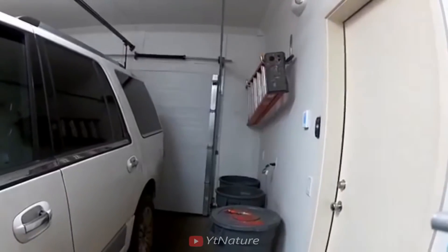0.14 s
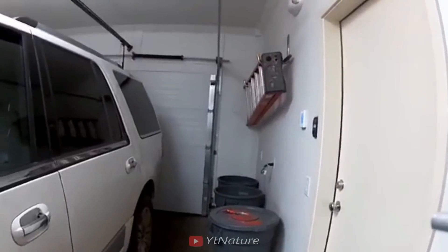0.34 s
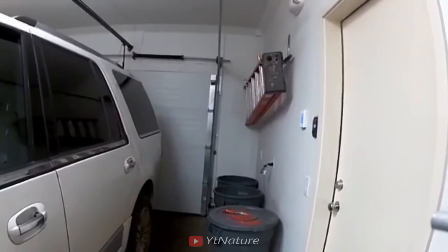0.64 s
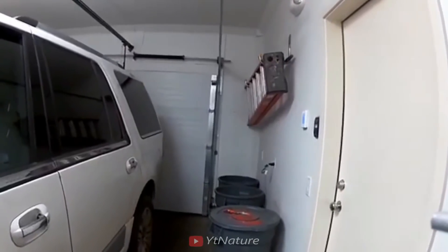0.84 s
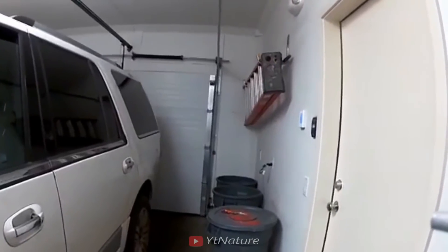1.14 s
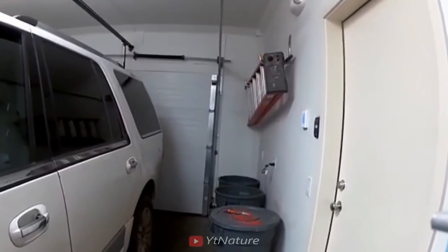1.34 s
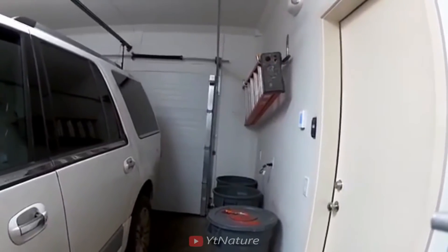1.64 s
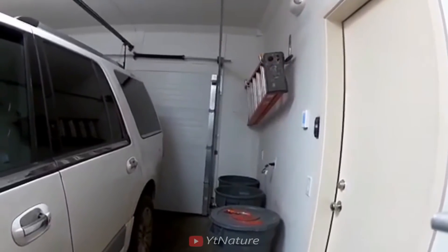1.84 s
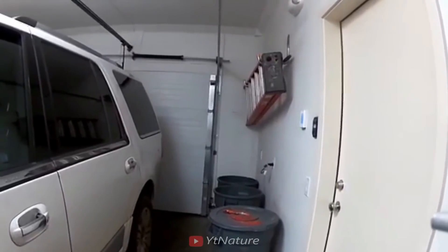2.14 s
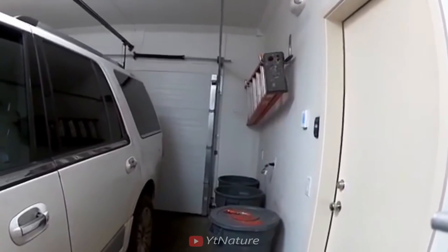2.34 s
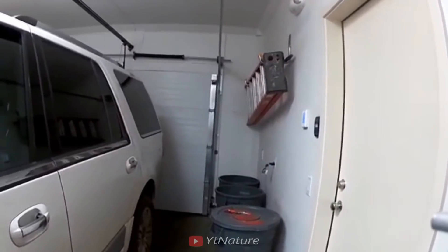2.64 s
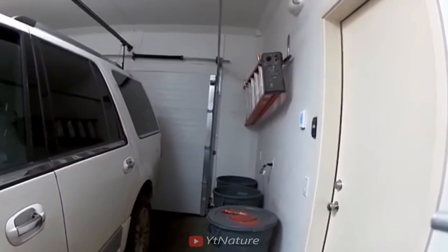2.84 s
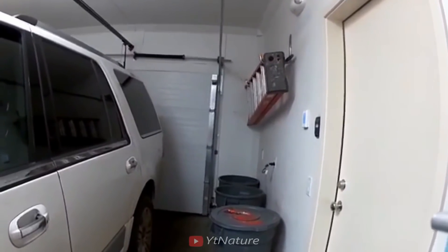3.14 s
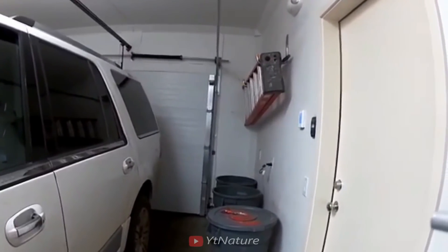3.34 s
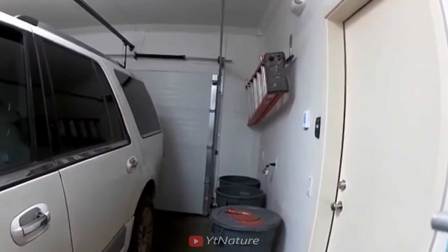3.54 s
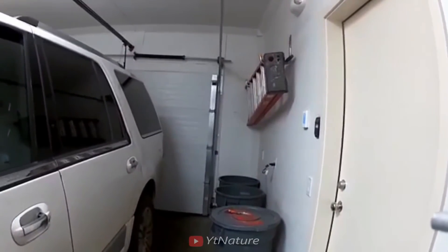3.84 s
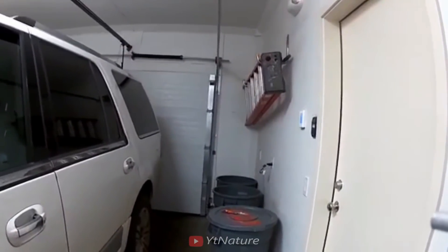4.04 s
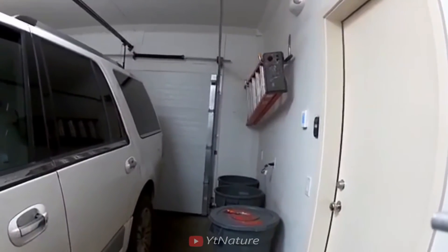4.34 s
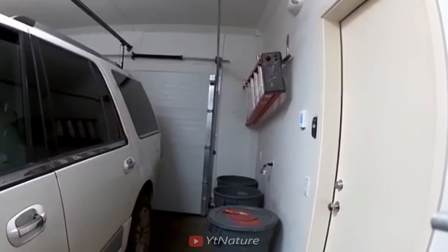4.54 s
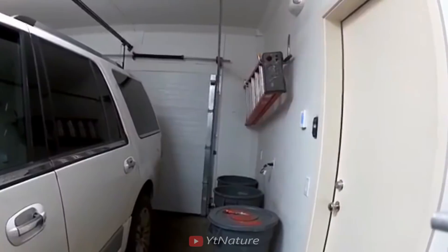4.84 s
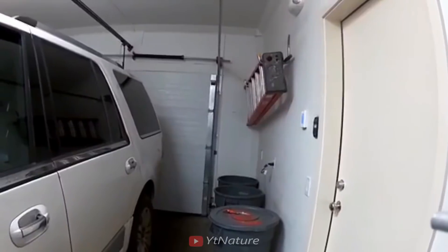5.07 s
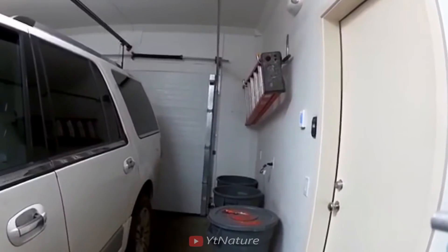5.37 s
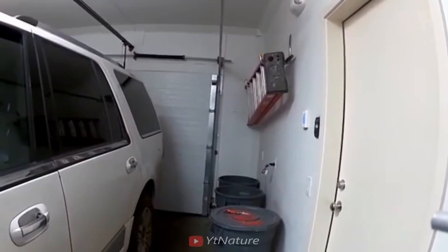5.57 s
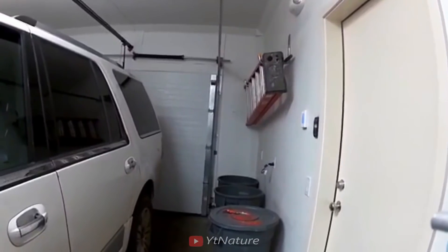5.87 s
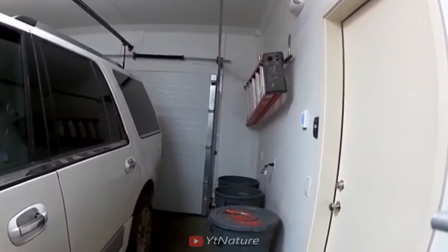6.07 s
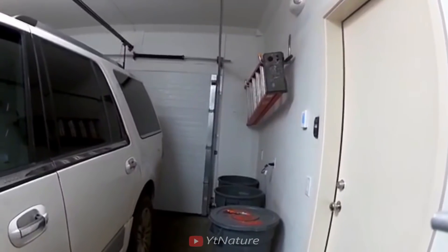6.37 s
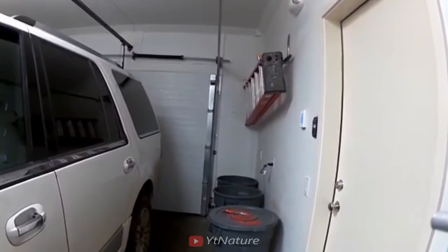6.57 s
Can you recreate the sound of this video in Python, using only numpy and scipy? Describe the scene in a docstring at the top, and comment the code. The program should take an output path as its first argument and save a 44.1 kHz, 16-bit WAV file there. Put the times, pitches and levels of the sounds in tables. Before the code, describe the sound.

An earthquake shakes a closed garage: panels thud, a loose door knocks, steel tracks and ladder clang and rattle over low ground rumble.

```python
"""Loose metal chatters at once, then thuds and clangs crash in: an earthquake shakes a closed garage.
Panels and walls thud, a loose door knocks in its frame, steel tracks and a hung ladder clang,
a small fitting jingles and hard little parts tick close by, all over a low ground rumble.
Struck things are sums of dying sine waves set off by random contacts; rumble and clatter are coloured noise.
One microphone hears it all, overdriven by the hardest blows, with its own faint hiss."""
import sys
import numpy as np
from scipy import signal
from scipy.fft import rfft, irfft, next_fast_len
from scipy.io import wavfile
from scipy.ndimage import uniform_filter1d, map_coordinates

SR = 44100
rng = np.random.default_rng(int(sys.argv[2]) if len(sys.argv) > 2 else 0)


def waveform_to_disk(signal):
    """Save audio, clipped to [-1, 1], as 16-bit WAV at the path in sys.argv[1]."""
    frames = np.transpose(np.atleast_2d(signal))
    scaled = np.clip(frames, -1, 1) * 32767
    samples = np.round(scaled).astype(np.int16)
    wavfile.write(sys.argv[1], SR, samples)


N = 295911  # length in samples


def amp(db):
    """Decibels to a plain multiplier."""
    return 10 ** (np.asarray(db) / 20)


def unit(x):
    """Scale a signal to an average (rms) strength of 1."""
    return x / np.sqrt(np.mean(x ** 2) + 1e-20)


def along(points, hz):
    """Read a curve of (pitch_hz, value) points, with pitch on a log axis."""
    f, v = np.transpose(points)
    return np.interp(np.log(hz + 1), np.log(f + 1), v)


def curve(points):
    """Join (start_s, value) points with straight lines, one value per sample."""
    s, value = np.transpose(points)
    return np.interp(np.arange(N) / SR, s, value)


def wobble(rate):
    """A smooth random curve with this many random points a second."""
    points = rng.standard_normal(int(N * rate / SR) + 4)
    return map_coordinates(points, [np.arange(N) * rate / SR])


def filtered(x, response):
    """Change the strength and timing of each frequency by a complex response."""
    m = next_fast_len(N + SR // 2)
    hz = np.fft.rfftfreq(m, 1 / SR)
    return irfft(rfft(x, m) * response(hz), m)[..., :N]


def noise(spectrum):
    """Steady noise of rms 1, coloured by a table of pitch_hz and level_db."""
    return unit(filtered(rng.standard_normal(N), lambda hz: amp(along(spectrum, hz))))


def rings(modes, size, attack):
    """One dying sine wave per mode, as rows; a soft contact (long attack, s) starts them gently."""
    hz, db, t60 = np.transpose(modes)[..., None]
    t = np.arange(size) / SR
    onset = 1 - np.exp(-(t / attack) ** 2)
    return amp(db - 60 * t / t60) * np.sin(2 * np.pi * hz * t) * onset


SHIFT = 0.016  # typical share by which modes move per blow, as the parts press differently on each other
FIRST_DB, FIRST_FADES_DB_PER_S = 5.5, 252.5  # first contact beside the hardest; softer in long scuffles
CRACK_S = 0.003  # time for the dry crack at each contact to fall 60 dB


def blows(table, modes, deep, ring_s, grows, lead, attack, focus_db, octaves, scatter_db, spiky_db, crack_db):
    """Each blow is a scuffle of contacts; its place favours modes near one pitch, long ones ring longer.

    Also returns each blow's loudness through time, offset by the last column in dB.
    That column also shifts the level of the modes marked deep, relative to the others."""
    size = SR // 4
    out, t = np.zeros((2, N + 2 * size)), np.arange(size) / SR
    pitch = np.log2(np.transpose(modes)[0])
    for s, db, hz, length, extra_db in table:
        chance = rng.standard_normal((3, size // 2))
        moved = np.array(modes) * (1 + SHIFT * chance[0, -len(modes):, None] * [1, 0, 0])
        ring = rings(moved, size, attack)
        near = np.exp(-((pitch - np.log2(hz)) / octaves) ** 2)
        mode_db = focus_db * near + extra_db * deep + scatter_db * chance[0, :len(modes)]
        decay = amp(-60 * t / max(ring_s + grows * length, .01))
        body = amp(mode_db) @ ring * decay
        crack = amp(crack_db - 60 * t / CRACK_S) * rng.standard_normal(size)
        body += crack * np.abs(body).max()
        # uneven contacts that thin out over the scuffle
        u = t[:size // 2] / max(length, .001)
        fade = u ** 0.093 * np.exp(-1.3 * u ** 1.41)
        contacts = chance[1] * amp(spiky_db * np.minimum(chance[2], 2.2)) * fade
        first = amp(FIRST_DB - FIRST_FADES_DB_PER_S * length) * np.abs(contacts).max()
        contacts[round(lead * SR)] = first
        sound = signal.fftconvolve([body, decay ** 2.28], [contacts, contacts ** 2], axes=1)
        loudest = np.sqrt(uniform_filter1d(sound ** 2, size=SR // 80).max(axis=1))
        level = amp([db - 8.5, db + extra_db]) / loudest  # peaks stand some dB over the rms
        out[:, round((s - lead) * SR):][:, :sound.shape[1]] += level[:, None] * sound
    return out[:, :N]


BIGGEST = 2.8  # cap on the size of a chatter knock, in spreads above the usual
TREMBLE_DB = -5  # even tremble beside the separate knocks


def chatter(level, modes, attack, t60, spiky_db, clumpy_db):
    """Dense small knocks of uneven size, in clumps, ring the modes over an even tremble."""
    size_db = spiky_db * np.minimum(rng.standard_normal(N), BIGGEST)
    knocks = rng.standard_normal(N) * amp(size_db + clumpy_db * wobble(35))
    knocks = unit(knocks) + amp(TREMBLE_DB) * rng.standard_normal(N)
    decay = amp(-60 * np.arange(SR // 4) / SR / t60)
    ring = rings(modes, SR // 4, attack).sum(0) * decay
    return signal.fftconvolve(level * unit(knocks), ring / np.linalg.norm(ring))[:N]


# strength of the ground rumble through time: start_s, level_db
RUMBLE_LEVEL = [(0.0, -34.5), (1.12, -41.5), (2.71, -41), (3.01, -42), (3.46, -43), (3.72, -37), (4.3, -44),
                (4.71, -40.5), (6.5, -45.5), (6.71, -43)]
# colour of the ground rumble: pitch_hz, level_db (per Hz)
GROUND_COLOUR = [(12, -12.5), (20, 13.5), (42, 19.5), (75, 13.5), (100, -26.5), (130, -8.5), (220, -120)]


def ground_rumble():
    """Low noise of the moving ground, swelling and sinking slowly."""
    return amp(curve(RUMBLE_LEVEL) + 0.39 * wobble(3.5)) * noise(GROUND_COLOUR)


# how long the room rings at each pitch: pitch_hz, time to fall 60 dB (s)
ROOM_DECAY = [(120, 0.28), (500, 0.22), (1500, 0.17), (6000, 0.35)]


def garage(x):
    """The room's answer, each frequency dying at its own speed; it changes as the sources move about."""
    step, wet = SR // 4, np.zeros(N + SR)
    for k in range(0, N, step):
        hz, t, z = signal.stft(rng.standard_normal(SR // 2), SR, nperseg=256)
        fade = amp(-60 * t / along(ROOM_DECAY, hz)[:, None])
        tail = signal.istft(z * fade, SR, nperseg=256)[1]
        answer = signal.fftconvolve(x[k:k + step], tail / np.linalg.norm(tail))
        wet[k + SR // 100:][:len(answer)] += answer  # 10 ms late
    return wet[:N]


# colour of the clatter of far things: pitch_hz, level_db (per Hz)
CLATTER_COLOUR = [(250, -120), (450, -1.5), (700, 1), (900, -1.5), (1400, -3.5), (2200, -2.5),
                  (2800, -26.5), (4000, -120)]


def far_clatter(shaking_db):
    """Far things blur into noise that follows the shaking."""
    return amp(shaking_db - 15 + 2.1 * wobble(12)) * noise(CLATTER_COLOUR)


# blows on a small metal fitting: start_s, level_db, favoured pitch_hz, contact length_s
FITTING_PINGS = [(0.539, -36, 6190, .01), (1.135, -40, 6190, .01), (1.568, -44, 4400, 0.015),
                 (2.48, -38, 6600, 0.036), (2.756, -33.5, 3170, 0.014), (2.82, -25, 3210, 0.0077),
                 (2.867, -29.5, 3260, 0.034), (3.67, -45, 6050, .01), (3.765, -32.5, 6030, .012),
                 (3.79, -34.5, 3210, 0.025), (5.268, -28, 3210, 0.02), (5.274, -41, 4540, 0.013),
                 (5.63, -34.5, 6400, .012), (6.094, -40, 3210, 0.019), (6.124, -28.5, 3080, 0.022),
                 (6.519, -30, 4600, 0.0087)]
# modes of the fitting: pitch_hz, level_db, time to fall 60 dB (s)
FITTING_MODES = [(2740, -4.5, 0.089), (3330, 0, 0.088), (3244, 0, 0.29), (3750, -9.5, 0.048),
                 (3900, -7.5, 0.088), (4300, -8.5, 0.074), (4500, -9, 0.066), (4440, -8, 0.091),
                 (5840, -15.5, 0.065), (6000, -13.5, .1), (6130, -11, 0.083), (6700, -17, .08),
                 (7010, -12.5, .08)]


def fitting(steel_db):
    """A small metal fitting jingles: high, narrow modes rung by blows and by steady chatter."""
    pings, _ = blows([(*row, 0) for row in FITTING_PINGS], FITTING_MODES, False, ring_s=0.097, grows=1.5,
                     lead=0.0015, attack=0.0014, focus_db=11.0, octaves=0.052, scatter_db=2.5,
                     spiky_db=8.5, crack_db=-22.5)
    return pings + chatter(amp(steel_db - 19), FITTING_MODES, attack=0.00065, t60=0.19,
                           spiky_db=8.5, clumpy_db=10.5)


DULL_HZ = 2250  # modes below this count as dull
TICK_S, TICK_DOUBLES_DB = 0.016, 15.5  # contact's 60 dB fall at level 0 dB; rise in level that doubles it
# ticks of small hard parts: start_s, bright modes level_db, dull modes beside them level_db
PART_TICKS = [(0.2391, -5, 13.5), (0.4244, -26, 7), (0.5467, -30, 2), (0.5686, -26, 6),
              (0.5852, -8.5, 17.5), (0.8361, -16, -1.5), (0.9143, -34, -1), (1.0207, -34, 11.5),
              (1.1, -27.5, 5.5), (1.3286, -25.5, -4), (1.4116, -10.5, 0.5), (1.936, -37, 0),
              (2.176, -49, -5.5), (2.2488, -29, 4), (2.284, -45, 13), (2.338, -36, 4), (2.601, -28.5, 10.5),
              (2.6465, -24.5, 6), (2.7343, -35.5, 12), (3.097, -32, -5), (3.4637, -47, 12),
              (3.515, -29.5, 6), (3.592, -30.5, 7), (3.647, -47, 0), (3.6538, -24.5, 1),
              (3.8595, -19.5, -5.5), (3.867, -33, -6), (3.874, -23, -1), (3.895, -29, 0),
              (3.9798, -27.5, 10), (4.0545, -45, -3), (4.3675, -15.5, 1.5), (4.4158, -32.5, 10),
              (4.4766, -32.5, 8), (4.7482, -19.5, 3), (4.7991, -27.5, 2), (5.1524, -24, -9),
              (5.309, -38, -3), (5.524, -30.5, 10), (5.654, -41, 3), (5.9416, -29.5, 10.5),
              (6.353, -22.5, 0.5), (6.4527, -33.5, -1), (6.5143, -42, -6)]
# modes of a small part: pitch_hz, level_db, time to fall 60 dB (s)
PART_MODES = [(701, -6, 0.042), (1328, 7, 0.013), (1980, 16.5, 0.0097), (2570, -3, 0.0087),
              (3282, -0.5, 0.0078), (3690, -5.5, 0.0056), (4200, -8, 0.003), (5570, -6.5, 0.0055),
              (6270, -3.5, 0.0034), (6100, -23, 0.013)]


def ticks():
    """A short rough contact rings a small hard part close to the microphone for some milliseconds."""
    size = SR // 30
    out, t = np.zeros(N + 2 * size), np.arange(size) / SR
    ring = rings(PART_MODES, size, attack=0.00047)
    dull = np.transpose(PART_MODES)[0] < DULL_HZ
    for s, db, dull_db in PART_TICKS:
        chance = rng.standard_normal((2, size))
        gains = amp(2.2 * chance[0, :len(PART_MODES)]) * [dull, ~dull]
        contact_s = TICK_S * 2 ** (db / TICK_DOUBLES_DB)
        contact = chance[1] * amp(-60 * t / contact_s)
        sound = signal.fftconvolve(gains @ ring, [contact], axes=1)
        level = amp([db + dull_db, db - 0.5]) / np.abs(sound).max(axis=1)
        out[round(s * SR):][:sound.shape[1]] += level @ sound
    return out[:N]


def small_parts(steel_db):
    """Single ticks over the steady chatter of the parts' higher modes."""
    return ticks() + chatter(amp(steel_db - 23.5), PART_MODES[3:], attack=0.00019, t60=0.0093,
                             spiky_db=16.5, clumpy_db=10)


DOOR_LOW_HZ = 45  # the door is weak below this
# a loose door knocks in its frame: start_s, level_db, ring of the leaf level_db (beside the knock)
DOOR_KNOCKS = [(0.1724, -4, -17), (0.567, -2, -10), (0.851, -12.5, -13), (1.0788, -3.5, -15),
               (1.447, -5, -2), (1.9184, -5, -5), (2.341, -6.5, -14), (2.823, -11, -7.5), (3.209, -4, -15),
               (3.638, 2, -8.5), (3.7359, -5, -14), (4.001, -6.5, -22), (4.8358, -3, -10.5),
               (5.291, -5, -0.5), (5.637, -1.5, -10), (6.4967, -13.5, -10.5)]
# it bounces against the frame three times: start_s (after the first), level_db
FRAME_JOLTS = [(0, -12.5), (0.0078, -5.5), (0.0155, -2.5)]
# the air pushed by each jolt: pitch_hz, level_db, time to fall 60 dB (s)
AIR_PUSH = [(215, 8, 0.009), (128.7, -14, 0.092), (156.8, -15, 0.2)]
# modes of the leaf, rung by the first jolt: pitch_hz, level_db, time to fall 60 dB (s)
LEAF_MODES = [(524.4, -1, 0.11), (383, -16.5, 0.12), (740, -5, 0.062), (655, -13, 0.084), (843, -14, 0.044),
              (1019, -3, 0.033)]


def door():
    """Three quick jolts, each pulling the air the same way; the leaf rings from the first."""
    size = SR // 4
    out = np.zeros(N + 2 * size)
    push = -rings(AIR_PUSH, size, attack=0.0012).sum(0)
    leaf = -rings(LEAF_MODES, size, attack=0.00094)
    for s, db, ring_db in DOOR_KNOCKS:
        chance = rng.standard_normal((2, len(LEAF_MODES)))
        for (after, jolt_db), uneven in zip(FRAME_JOLTS, chance[0]):
            out[round((s + after) * SR):][:size] += amp(db + jolt_db + 1.3 * uneven) * push
        out[round(s * SR):][:size] += amp(db + ring_db + 3.2 * chance[1]) @ leaf
    return filtered(out[:N], lambda hz: -hz ** 2 / (DOOR_LOW_HZ ** 2 - hz ** 2 + 1.4j * hz * DOOR_LOW_HZ))


# the countless upper modes of the steel, too dense to tell apart: pitch_hz, level_db (per Hz)
SIZZLE_COLOUR = [(700, -14), (1000, 20.5), (2300, 14.5), (2700, 0), (3300, 3), (4000, -8.5), (4700, -7.5),
                 (5700, -8.5), (6500, -11.5), (8000, -20.5)]


def sizzle(patchy_db):
    """Upper modes of the steel: narrow patches light up for some tens of ms, now here, now there."""
    z = signal.stft(noise(SIZZLE_COLOUR), nperseg=512)[2]
    field = uniform_filter1d(rng.standard_normal(z.shape), size=4, axis=0)
    field = uniform_filter1d(field, size=9, axis=1)
    return unit(signal.istft(z * amp(patchy_db * unit(field)), nperseg=512)[1][:N])


# blows on the steel: start_s, level_db, favoured pitch_hz, contact length_s, sizzle level_db (beside the blow)
STEEL_CLANGS = [(0.047, -11, 1590, 0.0066, -14), (0.109, -14, 1540, 0.057, -7),
                (0.1905, -6.5, 1860, 0.0098, -13.5), (0.2384, 2.5, 1900, 0.00087, -32.5),
                (0.3222, -4.5, 1680, 0.038, -12.5), (0.5352, -5, 1706, 0.022, -26),
                (0.5846, -25.5, 1620, 0.0011, -38), (0.6634, -24.5, 1290, 0.0055, -4.5),
                (0.6978, -16, 1480, 0.0065, -37.5), (0.8016, -9, 1600, 0.074, -22),
                (.875, -26, 1800, .02, -19), (0.9482, -10.5, 1780, .005, -25.5),
                (.953, -19, 1250, .01, -30.5), (1.08, -29.5, 1500, .02, -8.5),
                (1.13, -24, 1550, .025, -20.5), (1.1887, -16.5, 1635, 0.024, -19),
                (1.3089, -20, 2000, 0.01, -11.5), (1.3783, -14, 1290, 0.0047, -17.5),
                (1.4117, 1, 1690, 0.0053, -21), (1.4486, -6, 1280, 0.0075, -16.5),
                (1.58, -16, 1500, .008, -20), (1.5858, -10, 1800, 0.013, -29),
                (1.6312, -13.5, 1530, 0.024, -24), (1.748, -25, 1500, .04, -19),
                (1.8168, -7.5, 1270, 0.0084, -45), (1.885, -27, 1600, .015, -24),
                (1.921, -18, 1340, 0.015, -18), (1.9505, -16.5, 1500, 0.0048, -30.5),
                (2.1779, -16, 1920, 0.0015, -34), (2.2144, -17, 1290, 0.018, -26),
                (2.2548, -17.5, 1330, 0.0057, -16.5), (2.3027, -10, 1320, 0.0036, -40),
                (2.3935, -16.5, 1520, 0.012, -26.5), (2.4483, -12, 1640, 0.021, -31),
                (2.489, -32.5, 1590, 0.013, -8.5), (2.609, -8, 2000, 0.0033, -30),
                (2.6379, -25, 1500, 0.024, -8), (2.76, -24, 1480, 0.03, -14), (2.82, -13, 1820, 0.027, -14),
                (2.8774, -8.5, 1364, 0.011, -26.5), (2.9133, -7.5, 1480, 0.0039, -31),
                (2.9851, -17.5, 1600, 0.024, -49), (3.038, -16.5, 2000, 0.0061, -27.5),
                (3.0759, -16, 1300, 0.0046, -32), (3.1073, -11, 1720, 0.0083, -18.5),
                (3.31, -28, 1540, 0.023, -13.5), (3.4625, -13.5, 1900, 0.0054, -25),
                (3.485, -18, 1530, 0.02, -24.5), (3.53, -27, 2000, 0.014, -12.5),
                (3.6386, -16.5, 1490, 0.017, -14.5), (3.7434, -18, 1460, 0.01, -10),
                (3.7965, -7, 1520, 0.018, -32), (3.823, -17, 1500, .015, -30),
                (3.861, -14, 1535, 0.0074, -9.5), (3.893, -23, 1800, .02, -17),
                (3.9394, -19, 1470, 0.019, -25), (3.9784, -25.5, 1280, 0.03, -15),
                (4.232, -28.5, 1900, .02, -20), (4.2597, -34, 1480, 0.013, -24),
                (4.31, -31, 1800, 0.053, -4.5), (4.3685, -37, 1970, 0.0042, 2.5),
                (4.6603, -19.5, 2000, 0.0026, -35), (4.7077, -18.5, 1250, 0.0039, -15.5),
                (4.777, -16, 1990, 0.0043, -11), (4.798, -7, 1720, 0.0078, -37),
                (4.882, -33.5, 1520, 0.0076, -30.5), (4.995, -27, 1750, 0.005, -27),
                (5.0913, -23.5, 1650, 0.036, -13), (5.1517, -24, 2060, 0.0038, -3),
                (5.1971, -15.5, 2120, 0.0053, -20), (5.269, -16.5, 1840, 0.033, -9),
                (5.2914, -13, 1560, 0.044, -30), (5.4939, -18, 1930, 0.0023, -16),
                (5.5228, -25.5, 2010, 0.0066, -12.5), (5.633, -18.5, 1770, 0.0068, -12.5),
                (5.641, -13, 1290, 0.011, -13.5), (5.715, -29, 1800, 0.014, -20),
                (6.0137, -29, 1900, 0.014, -6), (6.095, -22, 1470, 0.017, -10),
                (6.127, -14.5, 1710, 0.02, -11.5), (6.1744, -20.5, 1540, 0.011, -7),
                (6.293, -21, 1320, 0.032, -15), (6.335, -21.5, 1780, 0.017, -11),
                (6.4527, -24, 2020, 0.002, -11), (6.4835, -24, 1290, 0.012, -20),
                (6.512, -14, 1300, 0.02, -15), (6.598, -31.5, 1280, .01, -24)]
# modes of the steel: pitch_hz, level_db, time to fall 60 dB (s)
STEEL_MODES = [(1273.4, 8.5, 0.43), (1253.4, 16.5, 0.45), (1463, 9, 0.11), (1530, 14, 0.1),
               (1526, 14, 0.059), (1627, 7.5, 0.25), (1810, 8, 0.66), (1781, 11, 0.16), (1828, -3, 0.64),
               (1992, 8, 0.45), (2273, 1.5, 0.16), (2170, -11, 0.14), (2400, -20.5, 0.25),
               (3300, -18.5, 0.19)]


def steel(steel_db, heave):
    """Tracks and ladder clang and chatter; each shake also excites the sizzle of their upper modes."""
    clangs, force = blows(STEEL_CLANGS, STEEL_MODES, False, ring_s=0.021, grows=10.7,
                          lead=0.002037, attack=0.00055, focus_db=8.5, octaves=0.14, scatter_db=4.5,
                          spiky_db=6.5, crack_db=-38)
    # a heaving panel also shakes the steel fixed to it
    shaken = chatter(amp(steel_db) + amp(-25.5) * heave, STEEL_MODES, attack=0.00065, t60=0.07,
                     spiky_db=12.0, clumpy_db=2.5)
    sizzle_level = force + amp(-46.5) * heave + amp(steel_db - 9.5 + 0.8 * wobble(33))
    return clangs + shaken + sizzle_level * sizzle(patchy_db=3.0)


DEEP_HZ = 175  # panel modes below this are deep
HEAVE_DB = -2.5  # level of the heave, and of the deep modes beside the others
# blows on the panels: start_s, level_db, favoured pitch_hz, contact length_s
PANEL_THUDS = [(0.046, -9, 338, 0.022), (0.189, 3, 352, 0.0066), (0.277, -14, 370, 0.0092),
               (0.321, 2.5, 628, 0.013), (0.359, -6.5, 348, 0.028), (0.534, -5.5, 624, 0.039),
               (0.566, -1, 257, 0.022), (0.608, -28, 166, 0.015), (0.675, -13.5, 175, 0.016),
               (0.726, -9, 347, 0.04), (0.8322, 8, 540, 0.012), (0.899, -6.5, 264, 0.022),
               (0.944, -11.5, 230, 0.023), (1.079, -14.5, 338, 0.096), (1.167, -22, 350, 0.021),
               (1.263, -30, 300, 0.011), (1.302, -19.5, 244, 0.016), (1.347, -12.5, 277, 0.017),
               (1.378, -6, 280, 0.015), (1.41, 0.5, 530, 0.021), (1.446, -2.5, 376, 0.029),
               (1.575, -15, 355, 0.11), (1.748, -12.5, 308, 0.022), (1.794, -9.5, 363, 0.021),
               (1.919, -9, 306, 0.039), (1.961, -12.5, 159, 0.018), (2.178, -16.5, 243, 0.021),
               (2.21, -9.5, 237, 0.021), (2.302, -7.5, 330, 0.012), (2.456, -18.5, 234, 0.0085),
               (2.597, -2.5, 286, 0.017), (2.654, -18, 148, 0.023), (2.688, -16, 266, 0.012),
               (2.82, -11, 358, 0.011), (2.858, -10, 160, 0.013), (3.07, -8.5, 286, 0.027),
               (3.101, -5.5, 274, 0.015), (3.252, -22.5, 350, 0.084), (3.359, -21, 371, 0.0046),
               (3.454, -8.5, 282, 0.027), (3.636, -10, 350, 0.048), (3.74, -5, 255, 0.027),
               (3.771, -14.5, 151, 0.0094), (3.795, -16, 820, .012), (3.857, 4, 240, 0.025),
               (3.894, 0.5, 270, 0.024), (4.04, -16.5, 278, 0.018), (4.206, -25, 302, 0.0205),
               (4.233, -16.5, 297, 0.026), (4.258, -6, 506, 0.024), (4.313, -13.5, 360, 0.0094),
               (4.418, -26, 715, 0.0073), (4.509, -18.5, 366, 0.04), (4.623, -15, 295, 0.094),
               (4.707, -5.5, 308, 0.0073), (4.795, -4, 332, 0.017), (4.834, -4, 294, 0.0076),
               (4.993, -14.5, 160, 0.0049), (5.085, -19.5, 293, 0.036), (5.106, -14.5, 296, .045),
               (5.293, -6.5, 354, 0.019), (5.316, -6.5, 161, 0.018), (5.519, -14, 353, 0.023),
               (5.639, -19, 350, 0.049), (5.67, -14.5, 160, 0.025), (5.874, -25.5, 350, 0.066),
               (5.912, -16, 270, 0.024), (6.094, -26.5, 830, 0.052), (6.124, -22, 606, 0.044),
               (6.161, -12, 370, 0.031), (6.29, -13, 303, 0.037), (6.374, -21.5, 720, 0.016),
               (6.485, -14.5, 365, 0.0049), (6.508, -14, 245, 0.027), (6.527, -20, 1034, 0.063),
               (6.659, -25.5, 270, 0.0092)]
# modes of the panels: pitch_hz, level_db, time to fall 60 dB (s)
PANEL_MODES = [(113, -24, 0.38), (156.3, -1.5, 0.16), (192, -5.5, 0.93), (223.5, -7.5, 1),
               (268.2, 1.5, 0.19), (314.4, -5, 0.21), (357.6, 2.5, 0.14), (426, -10, 0.068),
               (470.3, -4.5, 0.13), (519.6, -2, 0.17), (572, -8, 0.058), (595, -14, 0.19),
               (653, -24.5, 0.34), (719, -6.5, 0.18), (811, -6.5, 0.11), (870, -23, 0.11),
               (975, -1.5, 0.021), (1038, -10, 0.11), (1110, -26.5, 0.13)]


def panels(shaking_db):
    """Panels and walls thud in their low modes and chatter between blows; also returns their heave."""
    deep = np.transpose(PANEL_MODES)[0] < DEEP_HZ
    thuds, heave = blows([(*row, HEAVE_DB) for row in PANEL_THUDS], PANEL_MODES, deep, ring_s=0.15, grows=1.8,
                         lead=0.00198, attack=0.00039, focus_db=10.5, octaves=0.22, scatter_db=2.5,
                         spiky_db=8.5, crack_db=-33.0)
    shaken = chatter(amp(shaking_db), PANEL_MODES, attack=0.00055, t60=0.099, spiky_db=7, clumpy_db=4)
    return thuds + shaken, heave


LOWEST_HZ = 121  # panels radiate little below this


def radiate(hz):
    """Panels radiate little below their lowest mode."""
    return (-hz ** 2 / (LOWEST_HZ ** 2 - hz ** 2 + 1.3j * hz * LOWEST_HZ)) ** 2


# how hard the garage shakes between blows, as level of the panel chatter: start_s, level_db
SHAKING_LEVEL = [(0, -20), (.1, -30), (.2, -27.5), (.3, -29), (.42, -21.5), (.52, -28.5), (.63, -38),
                 (.75, -25), (1.0, -35), (1.14, -33.5), (1.31, -36), (1.42, -24), (1.64, -40), (1.81, -29),
                 (2.05, -37.5), (2.5, -29.5), (2.88, -31.5), (3.0, -29), (3.19, -33), (3.3, -33),
                 (3.42, -38), (3.52, -26), (3.62, -40.5), (3.75, -31.5), (3.89, -16), (4.04, -38.5),
                 (4.18, -39.5), (4.35, -38), (4.6, -47), (4.75, -35), (4.95, -33.5), (5.06, -38),
                 (5.3, -33.5), (5.45, -36.5), (5.77, -43), (6.08, -45.5), (6.35, -36.5), (6.47, -41.5),
                 (6.58, -42), (6.71, -48)]


def scene():
    """One shaking curve drives all the chatter; blows, room, door and ground are added to it."""
    shaking_db = curve(SHAKING_LEVEL)
    steel_db = shaking_db - 7  # steel chatter beside the panels
    panel_sound, heave = panels(shaking_db)
    near = panel_sound + steel(steel_db, heave) + fitting(steel_db) + far_clatter(shaking_db)
    knocks = door()
    close = small_parts(steel_db)
    room = garage(near + amp(4.0) * knocks + amp(-21.5) * close)
    struck = near + amp(-9.0) * room + close
    mono = filtered(struck, radiate) + knocks + ground_rumble()
    return np.array([mono, mono])


TOP_HZ = 8100  # nothing passes above this
# where the housing cancels sound: pitch_hz, width_hz, depth (0-1)
HOUSING_DIPS = [(1129.5, 266, 1), (5170, 880, 0.7)]
# colour of the microphone's hiss: pitch_hz, level_db (per Hz)
HISS_COLOUR = [(1530, -34), (2600, -10), (3300, -16.5), (5130, -15.5), (6390, -17), (7210, -18),
               (7960, -58), (10300, -101.5), (17500, -120)]


def record(dry):
    """Hiss, the housing's dips, overload, a roll-off to the band limit; the left channel trails by one sample."""
    def dips(f):
        return np.prod([1 - min(depth, 1) * 1j * f * w / (c * c - f * f + 1j * f * w)
                        for c, w, depth in HOUSING_DIPS], axis=0)

    def roll(hz):
        return (hz < TOP_HZ) / (1 + (hz / 7100) ** 24)

    x = filtered(dry + amp(-63.0) * noise(HISS_COLOUR), dips)
    x = x / (1 + np.abs(x / 0.6) ** 6) ** (1 / 6)  # peaks flatten towards 0.6
    lag = np.array([[1], [0]]) / SR  # left, right (s)
    return filtered(x, lambda hz: roll(hz) * np.exp(-2j * np.pi * hz * lag))


dry = scene()
out = record(dry)
waveform_to_disk(out)
```